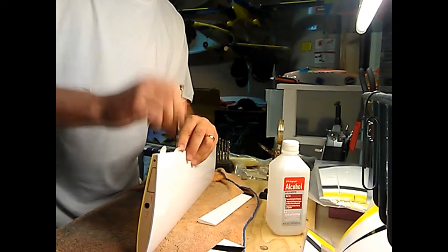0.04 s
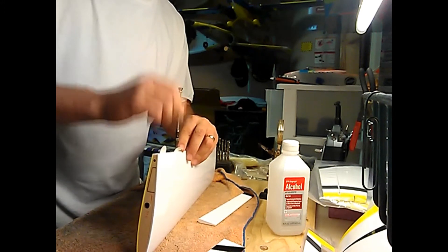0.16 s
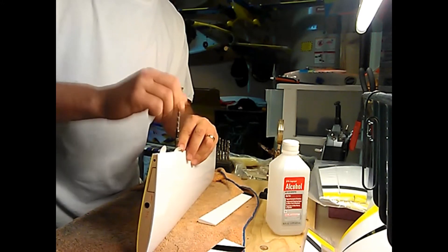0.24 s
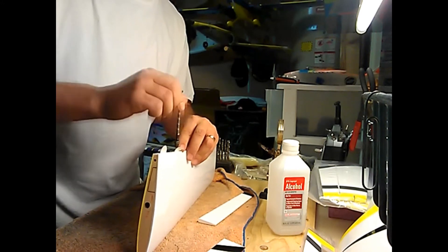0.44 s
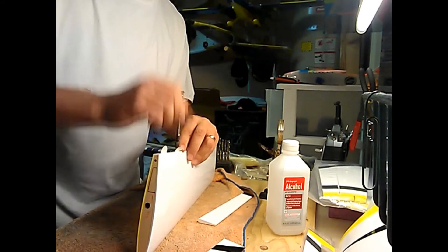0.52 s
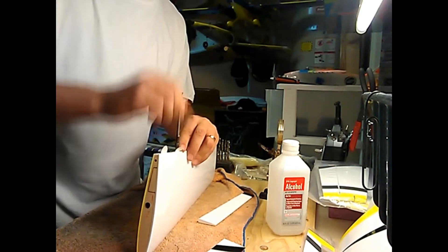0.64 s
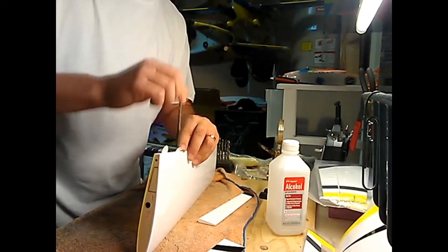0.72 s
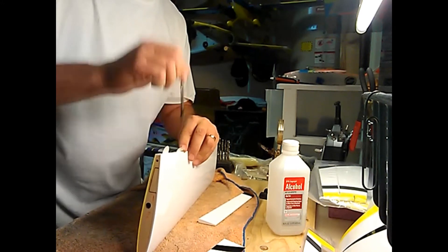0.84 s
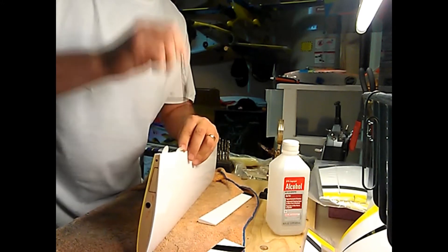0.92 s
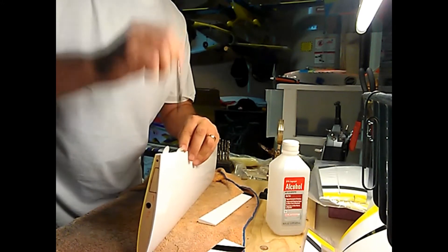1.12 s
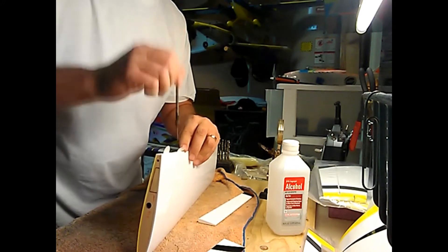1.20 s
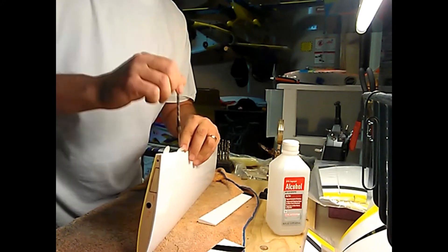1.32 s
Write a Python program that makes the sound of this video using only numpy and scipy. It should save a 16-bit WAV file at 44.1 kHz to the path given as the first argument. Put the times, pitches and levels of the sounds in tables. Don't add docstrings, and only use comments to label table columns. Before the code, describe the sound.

Close stereo pickup in a small workshop: short scratchy rasps of a hand-twisted drill bit in a foam panel, tiny chirps and clicks, a hard hollow knock, a bright final scrape, then near silence.

```python
import sys
import numpy as np
from scipy import signal
from scipy.fft import rfft, irfft
from scipy.io import wavfile
from scipy.ndimage import uniform_filter1d

SR = 44100
rng = np.random.default_rng(int(sys.argv[2]) if len(sys.argv) > 2 else 0)


def file_out(sig):
    cols = np.atleast_2d(sig).T
    lim = np.clip(cols, -1, 1)
    pcm = np.round(lim * 32767).astype(np.int16)
    wavfile.write(sys.argv[1], SR, pcm)


def linear_from_db(decibels):
    return 10 ** (np.asarray(decibels, float) / 20)


N = 59535


def evened(x):
    return x / np.sqrt(np.mean(x ** 2) + 1e-20)


def read(points, hz):
    f, value = np.transpose(points)
    return np.interp(np.log(hz + 1), np.log(f + 1), value)


def add(mix, s, sound):
    part = mix[round(s * SR):][:len(sound)]
    part += sound[:len(part)]


def drifting(shape, size):
    return evened(uniform_filter1d(rng.standard_normal(shape), size=size))


# frequency_hz, density_db (per Hz)
HUSH_SPECTRUM = [(30, -7.5), (100, -67), (175, -25.5), (330, -6.5), (760, 0.5), (1300, -3.5), (3800, -7),
                 (9100, -14.5)]
# frequency_hz, likeness (1 = same)
HUSH_LIKENESS = [(60, 0.81), (360, 0.78), (2140, 0.23), (12800, 0.4)]


def hush():
    level_db, patch_db, left_db = -60, 1.2, 1.37
    frames, hz = N // 256 + 5, np.fft.rfftfreq(1024, 1 / SR)
    a, b, c, d, patches = rng.standard_normal((frames, 513, 5)).T
    patches = uniform_filter1d(patches, size=12, axis=0)
    patches = evened(uniform_filter1d(patches, size=10, axis=1))
    same = np.clip(read(HUSH_LIKENESS, hz), -1, 1)[:, None]
    left = a + 1j * b
    right = same * left + np.sqrt(1 - same ** 2) * (c + 1j * d)
    z = np.array([left, right]) * linear_from_db(read(HUSH_SPECTRUM, hz)[:, None] + patch_db * patches)
    air = evened(signal.istft(z, nperseg=1024, noverlap=768)[1][:, :N])
    return linear_from_db(level_db) * air * linear_from_db(left_db * np.array([[1], [-1]]))


# frequency_hz, t60_s
ROOM_DECAY = [(300, 0.67), (1000, 0.42), (3000, 0.6), (8000, .33)]


def room(early_feed, late_feed):
    early_db, late_db, early_from_hz = 2.5, -3.5, 1200
    taps, early = np.zeros((2, SR)), np.zeros((2, 900))
    slots = np.arange(400, SR - 20, 20)
    at = slots + rng.integers(0, 20, (2, len(slots)))
    np.put_along_axis(taps, at, rng.choice([-1., 1.], at.shape), 1)
    hz, t, z = signal.stft(taps, SR, nperseg=256)
    fade = linear_from_db(-60 * t / read(ROOM_DECAY, hz)[:, None])
    tail = signal.istft(z * fade, SR, nperseg=256)[1]
    tail = linear_from_db(late_db) * tail / np.linalg.norm(tail[0])

    at = rng.integers(3, 220, (2, 12))
    np.put_along_axis(early, at, rng.choice([-1., 1.], at.shape) * np.exp(-at / 200), 1)
    early = linear_from_db(early_db) * early / np.linalg.norm(early, axis=1, keepdims=True)
    early = signal.lfilter(*signal.butter(2, early_from_hz, "high", fs=SR), early)
    bounces = signal.fftconvolve(early_feed[None], early, axes=1)[:, :N]
    return bounces + signal.fftconvolve(late_feed[None], tail, axes=1)[:, :N]


# centre_s, level_db, width_s
BENCH_PUSHES = [
    (.22, -77, 0.011),
    (0.429, -54, 0.0023),
    (.5, -72, 0.0024),
    (.535, -63.5, 0.0026),
]


def thud():
    out, t = np.zeros(N), np.arange(4000) / SR
    for s, db, width in BENCH_PUSHES:
        u = (np.arange(N) / SR - s) / width
        out += linear_from_db(db) * u * np.exp(-u ** 2)
    tap_s, tap_hz, tap_db, u = 1.188, 245, -69, t / .009
    add(out, tap_s, linear_from_db(tap_db) * np.sin(2 * np.pi * tap_hz * t) * (u * np.exp(1 - u)) ** 2)
    return out


# start_s, boom_db, body_db, ring_db, tick_db
CATCHES = [(.017, -60.5, -72, -57, -75), (.097, -62, -50, -50, -44), (.212, -45, -38, -38.5, -42),
           (.251, -74, -50.5, -59, -45), (.259, -71, -57, -67, -58), (.320, -66, -66, -42, -43),
           (.393, -65, -62, -38.5, -46), (.418, -45, -28.5, -22.5, -49.5), (.433, -80, -40, -33.5, -56),
           (.533, -63, -58, -41, -35.5), (1.191, -82, -82, -74, -50)]
# pitch_hz, level_db, cycles_to_peak
BENDING_MODES = [
    [(380, -13.5, 4.7), (427, -3, 4.8)],
    [(668.3, 1.5, 6.04), (993, -1, 8.7), (1177, -3.5, 3.34), (1525, -0.5, 3.6)],
    [(1640, -13.5, 1.67), (2235, -10, 15.6), (2167, 1.5, 5.8), (2060, -23, 15), (3200, -25, 11)],
    [(3725, -8.5, 26), (4070, -1, 4.7), (5390, -30, 26)],
]
GROUP_LEAN = [0.49, 1.3, 3, 0]


def knocks():
    swell_power, wobble = 5.26, .27
    out, t = np.zeros((len(BENDING_MODES), N)), np.arange(2600) / SR
    for s, *group_db in CATCHES:
        for track, level_db, group in zip(out, group_db, BENDING_MODES):
            for hz, db, cycles in group:
                u = t * hz / cycles
                waver = drifting((2, len(t)), round(4 * SR / hz))
                swell = (u * np.exp(1 - u)) ** swell_power * (1 + .5 * wobble * waver[0])
                phase = 2 * np.pi * (hz * t + rng.random()) + wobble * waver[1]
                add(track, s, linear_from_db(db + level_db) * swell * np.sin(phase))
    return linear_from_db(np.outer([1, -1], GROUP_LEAN)) @ out


# start_s, pitch_hz, level_db, length_s
SLIPS = [(.021, 722, -57, 0.01), (0.058, 3990, -50.5, 0.021), (.074, 2110, -50, 0.019),
         (0.078, 4080, -46, 0.0066), (0.083, 3250, -48, 0.011), (0.087, 2066, -49.5, 0.017),
         (.099, 683, -53.5, .014), (.096, 449, -52.5, 0.015), (0.132, 1473, -47.5, 0.021),
         (0.157, 3250, -49, 0.0088), (.158, 3850, -49, 0.041), (0.182, 1290, -45.5, 0.011),
         (.21, 3990, -43, 0.012), (.213, 970, -38.5, 0.016), (.215, 385, -47.5, 0.012),
         (0.248, 938, -45.5, .014), (0.257, 2953, -45, 0.017), (0.261, 766, -48, 0.012),
         (0.303, 3780, -47, 0.013), (.314, 2020, -40.5, 0.012), (0.316, 2784, -40.5, 0.02),
         (.323, 425, -48, 0.017), (.324, 968, -49, 0.022), (0.321, 3910, -52, 0.013),
         (0.387, 3200, -35, 0.0097), (0.403, 3800, -49, .014), (0.416, 4150, -38.5, 0.017),
         (0.449, 2230, -45.5, 0.013), (0.418, 1314, -33, 0.0079), (.422, 860, -42, 0.016),
         (.423, 4840, -39.5, 0.0062), (.418, 3174, -36, 0.0086), (0.448, 3120, -43, 0.0045),
         (.531, 3964, -39.5, 0.013), (.532, 2060, -39.5, 0.0045), (1.194, 4030, -60, 0.0066),
         (1.205, 4230, -62, .012), (0.523, 4076, -36.5, 0.021), (1.188, 3760, -52, 0.012),
         (1.196, 3700, -67, 0.017), (1.239, 3650, -61.5, 0.011)]


def chirps():
    out = np.zeros(N)
    for s, hz, db, length in SLIPS:
        t = np.arange(0, length, 1 / SR)
        waver = drifting(2000, 120)[:len(t)]
        tone = np.sin(2 * np.pi * hz * t + 0.56 * waver)
        add(out, s, linear_from_db(db) * np.sin(np.pi * t / length) * tone)
    return out


def resonate(x, peaks):
    drift_db, drift_s = 3.5, 0.026
    out = 0
    for k, (hz, width, db) in enumerate(peaks):
        drift = uniform_filter1d(rng.standard_normal(N), round(drift_s * SR))
        drift = evened(uniform_filter1d(drift, size=300))
        ring = signal.lfilter(*signal.iirpeak(hz, hz / width, SR), x)
        out = out + (-1) ** k * linear_from_db(db + drift_db * drift) * ring
    return out


# start_s, length_s, level_db, brightness_db, peak_place (0-1 of the length)
TWISTS = [(.005, 0.042, -58, 0, 0), (0.022, 0.088, -50, 1, 0.71), (0.106, 0.04, -47.5, -28, 1),
          (0.145, 0.099, -46.5, -19, 0.19), (0.228, 0.052, -48.5, -9, 0.68), (0.268, 0.065, -46, -4, 0.73),
          (0.326, 0.12, -42, -22, 0.77), (0.399, 0.12, -43.5, 3, 0.65), (0.503, 0.052, -48.5, 13.5, 0.29),
          (1.181, 0.091, -64.5, -1.5, 0), (0.21, 0.0106, -52.5, -15, 0), (0.297, 0.01, -51.5, -15, 0.1),
          (0.422, 0.016, -47, -24, 0.3), (0.531, 0.01104, -40, -2, 0.89)]
# pitch_hz, width_hz, level_db
PANEL_RESONANCES = [(460, 135, -6), (654, 202, 4.5), (1035, 455, 2), (1430, 305, 4), (2177, 360, 1.5),
                    (2764, 190, 1), (3250, 620, -3.5), (4040, 445, 5.5)]
# pitch_hz, width_hz, level_db
FOAM_RESONANCES = [(6320, 860, 0.5), (7010, 730, 8), (8160, 2200, 2), (8580, 290, 6.5), (11260, 2200, 3)]


def twisting():
    edge_sharpness, clicks_per_s, click_spread_db = 0.88, 6100, 0.5
    apart, broad_db = 0.42, -4.5
    dull, bright = np.zeros(N), np.zeros(N)
    for start, length, db, bright_db, top in TWISTS:
        u = np.linspace(0, 1, round(length * SR))
        top = np.clip(top, .05, .95)
        shape = linear_from_db(db) * np.where(u < top, u / top, (1 - u) / (1 - top)) ** edge_sharpness
        add(dull, start, shape)
        add(bright, start, shape * linear_from_db(bright_db))

    chance, sign, size = rng.random((3, 2, N))
    clicks = (chance < clicks_per_s / SR) * np.sign(2 * sign - 1)
    clicks = clicks * linear_from_db(-click_spread_db * np.log(size + 0.047))
    clicks = evened(np.array([clicks[0] + apart * clicks[1], clicks[0] - apart * clicks[1]]))
    broad = signal.lfilter(*signal.butter(1, [500, 9000], "band", fs=SR), clicks)
    body, fizz = resonate(clicks, PANEL_RESONANCES), resonate(clicks, FOAM_RESONANCES)
    return dull * (evened(body) + linear_from_db(broad_db) * evened(broad)) + bright * evened(fizz)


def scene():
    knock_early_db, knock_room_db, low_cut_hz, left_db = -10, -7, 269, 1.7
    rasp, hits = twisting(), knocks() + chirps()
    work = rasp + hits
    wet = room(rasp[0] + linear_from_db(knock_early_db) * hits[0], rasp[0] + linear_from_db(knock_room_db) * hits[1])
    heard = np.array([np.roll(work[0], 1), work[1]]) + wet
    heard = signal.sosfilt(signal.butter(5, low_cut_hz, "high", fs=SR, output="sos"), heard)
    return linear_from_db(left_db * np.array([[1], [-1]])) * (heard + thud()) + hush()


def roll_off(x):
    return signal.sosfilt(signal.butter(12, 13390, fs=SR, output="sos"), x)


def record(dry):
    cut_hz, top_lo_hz, top_hi_hz, top_db = 9050, 11750, 13050, -24.5
    hz = np.fft.rfftfreq(N, 1 / SR)
    gain = 1 / (1 + (hz / cut_hz) ** 400)
    gain = gain + linear_from_db(top_db) * ((hz > top_lo_hz) & (hz < top_hi_hz))
    return roll_off(irfft(rfft(dry) * gain, N))


dry = scene()
out = record(dry)
file_out(out)
```